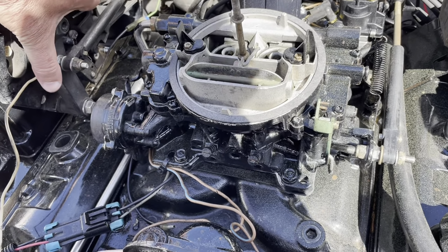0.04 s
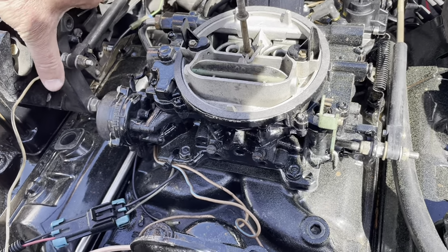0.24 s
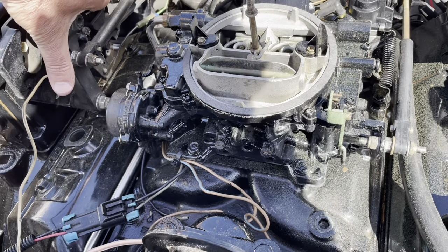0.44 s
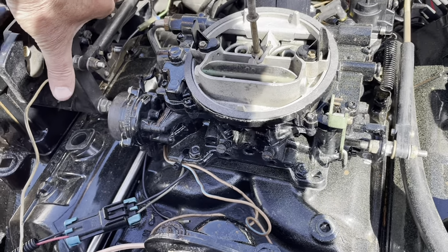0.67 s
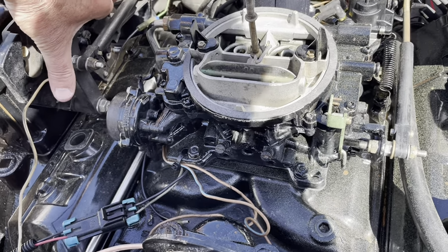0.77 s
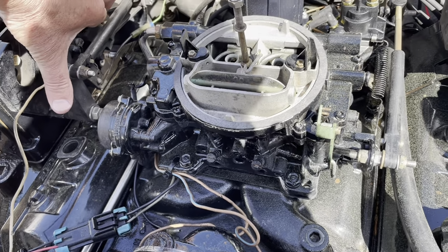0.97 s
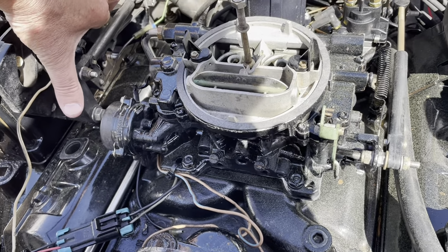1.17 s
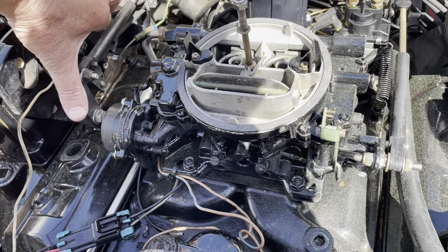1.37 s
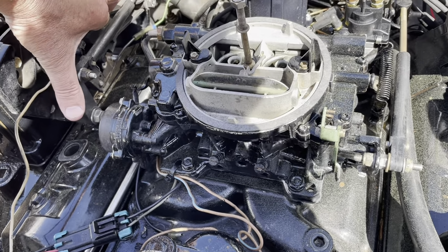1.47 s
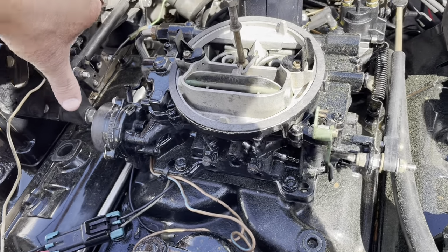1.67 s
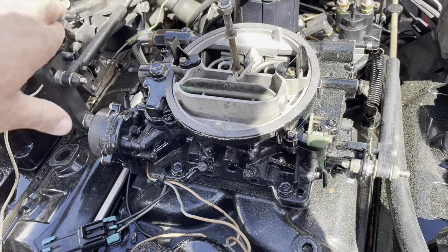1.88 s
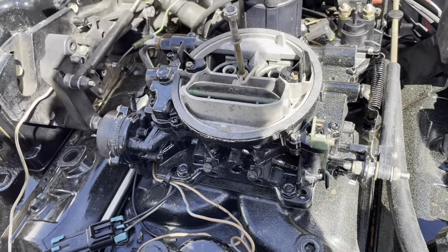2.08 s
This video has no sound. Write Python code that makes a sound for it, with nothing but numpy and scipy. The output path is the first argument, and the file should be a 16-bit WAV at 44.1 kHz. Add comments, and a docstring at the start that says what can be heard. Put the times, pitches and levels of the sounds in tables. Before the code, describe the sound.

A rough-running boat engine clatters and thuds, then sputters, slows and dies, leaving thin hiss

```python
"""An open boat engine runs roughly, with thuds in the exhaust, then loses its ignition and coasts down.
Rumble, clatter and hiss are coloured noise that pumps with the piston strokes; each thud is a short dying ring.
As the engine rocks back once, the intake gasps: three gliding bands of noise. A low, gliding hum rings on in the pipe.
A thin hiss with steady whines, there from the start, is left over, with brief swishes of gliding noise.
Two close microphone ports hear it all, each a little differently."""
import sys
import numpy as np
from scipy import signal
from scipy.fft import rfft, irfft, next_fast_len
from scipy.io import wavfile
from scipy.ndimage import uniform_filter1d, map_coordinates

SR = 44100
rng = np.random.default_rng(int(sys.argv[2]) if len(sys.argv) > 2 else 0)


def to_wav(sig):
    """Store sig (one row per channel, or 1-D mono) as 16-bit WAV at the path in sys.argv[1].

    Samples outside -1..1 are clipped; the rate is SR.
    """
    pcm = np.clip(np.atleast_2d(sig), -1, 1) * 32767
    pcm = np.round(pcm).astype(np.int16)
    wavfile.write(sys.argv[1], SR, pcm.T)  # frames by channels


def gain_from_db(level_db):
    """Turn a decibel level (scalar or array-like) into a linear amplitude factor."""
    decades = np.asarray(level_db, float) / 20
    return 10 ** decades


N = 93844  # length in samples

# Tables give relative levels: the sources may still add a fixed gain.
# How fast the strokes come: t/s, rate/(cylinder strokes per s)
STROKE_RATE = [(0, 42), (.45, 40), (.7, 33), (.95, 22), (1.15, 11), (1.4, 4)]
# Loudness of the engine's body: t/s, exhaust rumble level/dB, block noise level/dB
ENGINE_LEVELS = [(0.0, -33.5, -34), (0.086, -34, -36), (0.316, -35, -30.5), (0.438, -30, -35.5),
                 (0.454, -39, -35), (0.55, -32, -35.5), (0.654, -38.5, -32.5), (0.68, -37.5, -39),
                 (0.726, -37.5, -41), (0.872, -33, -46.5), (0.884, -41.5, -44.5), (0.944, -37.5, -49.5),
                 (0.96, -39, -48), (0.98, -41, -54.5), (1.01, -43.5, -51.5), (1.048, -40.5, -51.5),
                 (1.072, -43.5, -56.5), (1.14, -41, -46.5), (1.366, -57, -69), (1.39, -61, -56.5),
                 (1.466, -63, -65.5), (1.5, -61.5, -69)]
# Loudness of the air drawn in: t/s, hiss level/dB, treble boost/dB
INTAKE_LEVELS = [(0.0, -37, -9), (0.046, -33, -11.5), (0.73, -37, -8.5), (0.822, -42, -4), (0.878, -39, -7),
                 (0.908, -45.5, -4), (0.962, -43, -3), (1.01, -45.5, -7.5), (1.05, -56.5, -11),
                 (1.074, -50.5, -27), (1.132, -43.5, -8), (1.14, -46.5, -6), (1.168, -41.5, -10),
                 (1.204, -48, -14), (1.242, -58.5, -20), (1.3, -57.5, -17)]
# Whistle of the intake: t/s, f/Hz, level/dB
WHISTLE_PATH = [(0, 1383, -32), (.2, 1400, -38), (.4, 1397, -39.5), (.44, 1350, -39.5), (.5, 1020, -53),
                (.54, 990, -31.5), (.6, 960, -43), (.66, 1200, -76), (.72, 1410, -38), (.76, 1410, -59),
                (.85, 1400, -72), (1, 1400, -87)]
# Low after-ring of the exhaust pipe: t/s, f/Hz, level/dB
DRONE_PATH = [(1.1, 62, -77), (1.2, 58.2, -54), (1.33, 54.2, -44), (1.42, 52.4, -52), (1.55, 50.7, -50),
              (1.62, 50, -66), (1.8, 52.2, -65.5), (2.13, 49.7, -62)]
# Heavy exhaust puffs: t/s, level/dB, f/Hz, time to fall by 60 dB/s
EXHAUST_THUDS = [(0.107, -22.5, 131, 0.049), (.062, -23, 350, 0.026), (0.127, -18, 221, 0.031),
                 (0.292, -17, 278, 0.034), (.292, -19.5, 580, 0.041), (.648, -23.5, 519, 0.048),
                 (.862, -23.5, 490, 0.023), (0.295, -24, 62.6, 0.07), (0.357, -23, 400, 0.023),
                 (0.504, -23.5, 75, 0.079), (.54, -24, 79, 0.089), (0.562, -24, 120, .05),
                 (.612, -24, 70, 0.082), (0.627, -21, 388, 0.032), (0.84, -13.5, 293, 0.012),
                 (.878, -21.5, 107, 0.072), (0.953, -29, 110, .06), (0.973, -18.5, 125, 0.029),
                 (1.048, -33, 247, 0.05), (1.133, -30, 64.3, 0.087)]
# Colours of the exhaust pipe, block, intake throat and open air, each: f/Hz, level/dB
PIPE_COLOUR = [(15, -36), (25, -8), (65, 3), (97, -3), (141, 1.5), (199, -2.5), (270, -5), (400, -11.5),
               (520, -25.5), (880, -120)]
BLOCK_COLOUR = [(120, -9.5), (200, -5), (300, -3), (470, -6), (900, -4.5), (1050, -8.5), (1400, -10.5),
                (2000, -16), (4000, -69)]
THROAT_COLOUR = [(600, -24), (1100, -1.5), (1400, -0.5), (1800, -6.5), (2400, -0.5), (3400, -3.5),
                 (4500, -12), (5500, -6.5), (7000, -7.5), (8200, -10.5), (9000, -4.5), (9600, -5),
                 (10500, -8), (12000, -15.5), (12800, -8.5), (13400, -21), (15000, -4.5), (15700, -29)]
AIR_COLOUR = [(30, -1), (55, 7), (110, -1), (400, -8), (1200, -4), (2000, -8), (2800, -27), (3800, -12.5),
              (5000, -10.5), (5800, -16), (6800, -3.5), (8500, -9.5), (10000, -10.5), (12000, -12),
              (13500, -19), (15500, -16.5)]
# Resonances of the throat and the block, each: f/Hz, width/Hz, level/dB
THROAT_RESONANCES = [(1623, 37, 6.5), (2016, 29, 8.5), (2245, 84, 7.5), (2433, 22, 6.5), (3105, 52, 5),
                     (3970, 86, 6), (4940, 180, 4.5), (5730, 130, 5.5), (9720, 140, 6.5)]
BLOCK_RESONANCES = [(400, 25, 0), (609, 15, 4), (676, 22, 2.5), (829, 28, 4.5), (975, 36, 3.5)]
# Bands of the backward gasp: start f/Hz, end f/Hz, width/Hz, level/dB
GASP_BANDS = [(2335, 2400, 800, -44.5), (5080, 6000, 760, -52.5), (2930, 3000, 360, -54)]
# Background air: t/s, level/dB, extra bass level/dB
AIR_LEVELS = [(0, -43, 14), (1.3, -51.5, -1), (1.58, -50, -4.5), (1.68, -50, -11), (1.85, -50.5, -2.5),
              (1.95, -49.5, 1), (2.13, -48.5, 8)]
# Steady whines: f/Hz, width/Hz, level/dB
STEADY_WHINES = [(1347, 30, -67), (2024, 25, -67), (3365, 50, -62), (5105, 20, -65), (6560, 200, -65),
                 (10050, 250, -65)]
# Brief swishes: t/s, length/s, start f/Hz, end f/Hz, width/Hz, level/dB
BRIEF_SWISHES = [(1.94, .115, 4550, 5500, 750, -56), (1.577, .022, 2900, 4000, 1200, -58),
                 (1.025, .025, 6700, 6700, 500, -55)]
# Phase by which the left port leads the right: f/Hz, phase/rad
PORT_LEAD = [(0, 0), (200, -.15), (690, -.7), (2580, .4), (4900, .2), (6500, -.9), (8250, -np.pi),
             (11600, -2 * np.pi), (14900, -3 * np.pi)]
# Likeness of the two ports: f/Hz, likeness (1 = the same)
PORT_LIKENESS = [(60, .86), (250, .86), (700, .6), (1300, .45), (2400, .62), (4400, .75), (7000, .93),
                 (8300, .99), (9500, .95), (11600, .99), (13000, .95), (15000, .99)]
# Loudness of left over right: f/Hz, level/dB
PORT_TILT = [(60, 1.5), (110, 0.0), (200, 0.5), (380, 1), (700, 2.5), (1290, -2.5), (2380, 2.0), (4400, 7),
             (8120, -1.5), (15000, 1)]

STROKE_SCATTER_DB, JITTER_STROKES = 3, .25  # unevenness in size and timing: the rough running
FULL_PUMPING_RATE = 36  # strokes per s above which the pumping is fully heard
RUMBLE_PUMPING, BLOCK_PUMPING, HISS_PUMPING = .3, .15, .15  # depth of the pumping
PUFF_SHARE = .33  # exhaust puffs added to the rumbling noise
WHISTLE_WIDTH_HZ = 130
GASP_START_S, GASP_LENGTH_S = 1.1, .115
WHINE_WANDER = .25  # share of its width by which a whine drifts
MIC_LOW_HZ, MIC_TOP_HZ = 37, 15750  # limits of what the ports pick up


def unit(x):
    """Scales a sound to an average strength (rms) of 1."""
    return x / np.sqrt(np.mean(x ** 2) + 1e-20)


def along(points, hz):
    """Reads a curve of (Hz, value) points, spaced as the ear hears pitch."""
    f, value = np.transpose(points)
    return np.interp(np.log(hz + 1), np.log(f + 1), value)


def curves(rows):
    """Turns each column after the time into one value per sample."""
    s, *columns = np.transpose(rows)
    return [np.interp(np.arange(N) / SR, s, column) for column in columns]


def wobble(rate):
    """Draws a smooth random curve through rate random points a second."""
    return map_coordinates(rng.standard_normal(1000), [np.arange(N) * rate / SR])


def filtered(x, response):
    """Changes strength and phase at each frequency by the given response."""
    size = next_fast_len(N + 8192)  # spare room for the ringing
    hz = np.fft.rfftfreq(size, 1 / SR)
    return irfft(rfft(x, size) * response(hz), size)[..., :N]


def noise(colour, resonances=()):
    """Makes two unrelated noises of one colour; resonances lift narrow bands."""
    def response(hz):
        lift = sum(db / (1 + ((hz - centre) / width) ** 2) for centre, width, db in resonances)
        return gain_from_db(along(colour, hz) + lift)
    return unit(filtered(rng.standard_normal((2, N)), response))


def narrow(centre_hz, width_hz):
    """Makes two unrelated noises, each passed twice through one resonance."""
    def response(hz):
        return (hz * width_hz / (centre_hz ** 2 - hz * hz + 1j * hz * width_hz)) ** 2
    return unit(filtered(rng.standard_normal((2, N)), response))


def gliding(pitch_hz, width_hz):
    """Makes two unrelated narrow noises by moving slow noise up to a changing pitch."""
    slow = filtered(rng.standard_normal((2, 2, N)), lambda hz: 1 / (1 + (2 * hz / width_hz) ** 4))
    phase = 2 * np.pi * np.cumsum(pitch_hz) / SR
    return unit(slow[0] * np.cos(phase) + slow[1] * np.sin(phase))


def sweep(s, length, start_hz, end_hz, width_hz, db, blunt):
    """Makes a short band of noise that glides; a small blunt gives a flat top."""
    progress = np.clip((np.arange(N) / SR - s) / length, 0, 1)
    shape = np.abs(np.sin(np.pi * progress)) ** blunt * (progress < 1)
    pitch_hz = start_hz + (end_hz - start_hz) * progress
    return gain_from_db(db) * shape * gliding(pitch_hz, width_hz)


def strokes():
    """Gives each cylinder stroke a sharp kick and a smooth swell, of its own random size."""
    count = np.cumsum(curves(STROKE_RATE)[0]) / SR + JITTER_STROKES * wobble(25)
    sizes = gain_from_db(STROKE_SCATTER_DB * rng.standard_normal(200))
    size = sizes[np.clip(count, 0, 199).astype(int)]
    kicks = size * np.append(0, np.diff(np.floor(count)) > 0)
    return kicks, size * np.sin(np.pi * count) ** 2


def pumping(swell, depth):
    """Makes a sound rise and fall with the strokes, less so as the engine slows."""
    running = np.clip(curves(STROKE_RATE)[0] / FULL_PUMPING_RATE, 0, 1) ** 2
    return 1 + depth * running * (2 * swell - 1)


def exhaust_rumble(kicks, swell):
    """Noise and one puff per stroke, both coloured by the exhaust pipe."""
    puffs = unit(filtered(kicks, lambda hz: gain_from_db(along(PIPE_COLOUR, hz))))
    direct_puffs = puffs * [[1], [0]]
    rumble = unit(pumping(swell, RUMBLE_PUMPING) * noise(PIPE_COLOUR) + PUFF_SHARE * direct_puffs)
    return gain_from_db(curves(ENGINE_LEVELS)[0] - 0.5) * rumble


def block_noise(swell):
    """Flickering noise that rings in the resonances of the engine block."""
    flicker = gain_from_db(1.5 * wobble(29.17))
    clatter = pumping(swell, BLOCK_PUMPING) * flicker * noise(BLOCK_COLOUR, BLOCK_RESONANCES)
    return gain_from_db(curves(ENGINE_LEVELS)[1] + 2.0) * unit(clatter)


def intake_hiss(swell):
    """Flickering noise that rings in the intake throat, with a treble that changes on its own."""
    level_db, treble_db = curves(INTAKE_LEVELS)
    flicker = gain_from_db(0.91 * wobble(90.3))
    hiss = unit(pumping(swell, HISS_PUMPING) * flicker * noise(THROAT_COLOUR, THROAT_RESONANCES))
    treble = filtered(hiss, lambda hz: 1 / (1 + (7500 / (hz + 1)) ** 8))
    return gain_from_db(level_db + 3.0) * (hiss + (gain_from_db(treble_db + 8.5) - 1) * treble)


def intake_whistle():
    """A narrow noise whose pitch and loudness move over time."""
    pitch_hz, level_db = curves(WHISTLE_PATH)
    return gain_from_db(level_db) * gliding(pitch_hz, WHISTLE_WIDTH_HZ)


def pipe_drone():
    """A low pure tone of gliding pitch: the after-ring of the exhaust pipe."""
    pitch_hz, level_db = curves(DRONE_PATH)
    tone = np.sin(2 * np.pi * np.cumsum(pitch_hz) / SR)
    return gain_from_db(level_db) * tone * [[1.4], [0]]  # direct sound only


def engine():
    """Exhaust, block and intake share the same strokes; whistle and drone follow their own paths."""
    kicks, swell = strokes()
    body = exhaust_rumble(kicks, swell) + block_noise(swell)
    return body + intake_hiss(swell) + intake_whistle() + pipe_drone()


def thuds():
    """Each heavy exhaust puff is one short dying ring with a breath of noise."""
    out, t = np.zeros((2, N + SR)), np.arange(SR // 5) / SR
    for s, db, hz, t60 in EXHAUST_THUDS:
        breath = uniform_filter1d(rng.standard_normal(len(t)), size=12)
        ring = np.sin(2 * np.pi * hz * t) + 0.24 * breath
        onset = 1 - np.exp(-t / 0.002)
        out[0, round(s * SR):][:len(t)] += gain_from_db(db + 5 - 60 * t / t60) * onset * ring
    return out[:, :N]


def gasp():
    """Air pushed back through the open throat as the shaft rocks back: gliding bands of noise."""
    return sum(sweep(GASP_START_S, GASP_LENGTH_S, *band, blunt=0.34) for band in GASP_BANDS)


def swishes():
    """Short bands of noise, gliding or holding their pitch."""
    return sum(sweep(*row, blunt=0.36) for row in BRIEF_SWISHES)


def whines():
    """Each whine is a slightly drifting tone inside a narrow noise."""
    out = np.zeros((2, N))
    for hz, width, db in STEADY_WHINES:
        pitch_hz = hz + WHINE_WANDER * width * wobble(40)
        tone = np.sin(2 * np.pi * np.cumsum(pitch_hz) / SR) * [[1], [0]]
        out += gain_from_db(db + .7 * wobble(4)) * (tone + .55 * narrow(hz, width))
    return out


def background_air():
    """Coloured noise for hiss and distant rumble, with a bass that changes on its own."""
    level_db, bass_db = curves(AIR_LEVELS)
    air = noise(AIR_COLOUR)
    bass = filtered(air, lambda hz: 1 / (1 + (hz / 250) ** 4))
    return gain_from_db(level_db) * (air + (gain_from_db(bass_db) - 1) * bass)


def scene():
    """Adds all sources in two rows: the direct sound and its diffuse (spread-out) twin."""
    return engine() + thuds() + gasp() + swishes() + whines() + background_air()


def top_cut(x):
    """Nothing passes above the cut-off."""
    return signal.sosfilt(signal.butter(12, 15660, fs=SR, output="sos"), x)


def record(dry):
    """Both ports share the direct sound with a lag; the diffuse row has opposite signs in them."""
    def ports(hz):
        angle = np.arccos(np.clip(along(PORT_LIKENESS, hz), 0, 1)) / 2
        direct, diffuse = np.cos(angle), np.sin(angle)
        mixing = np.array([[direct, diffuse], [direct, -diffuse]])
        # each port takes half of the difference in loudness and phase
        half = gain_from_db(along(PORT_TILT, hz) / 2) * np.exp(.5j * np.interp(hz, *np.transpose(PORT_LEAD)))
        pickup = (hz < MIC_TOP_HZ) / (1 + (MIC_LOW_HZ / (hz + 1)) ** 4)
        return mixing * [[half], [1 / half]] * pickup
    mix = filtered(dry, ports).sum(1)
    return top_cut(mix)


dry = scene()
out = record(dry)
to_wav(out)
```